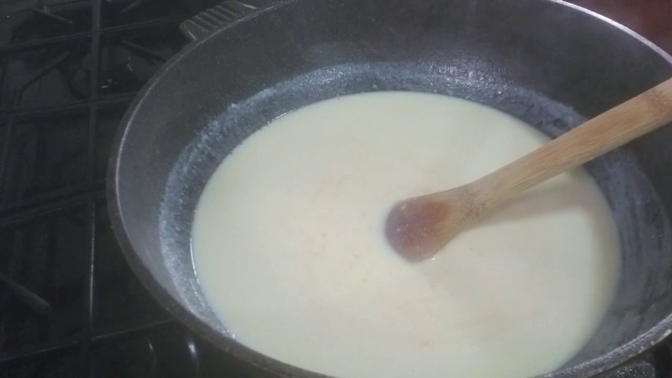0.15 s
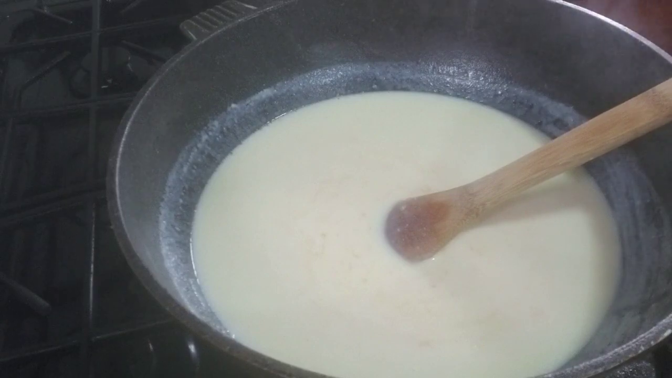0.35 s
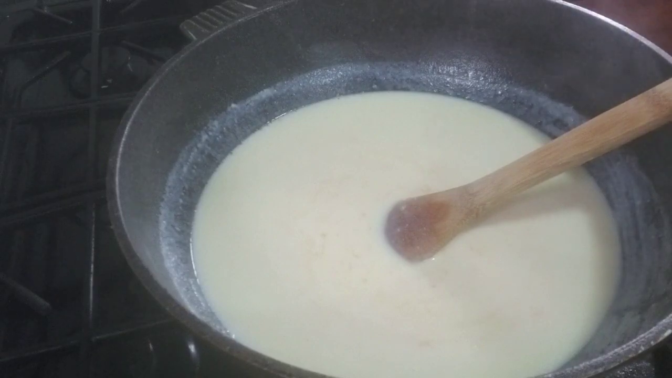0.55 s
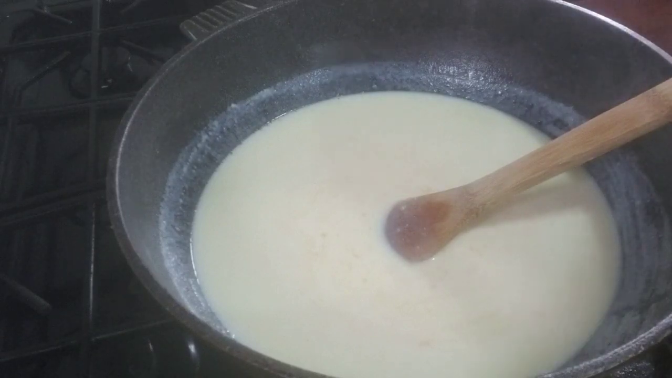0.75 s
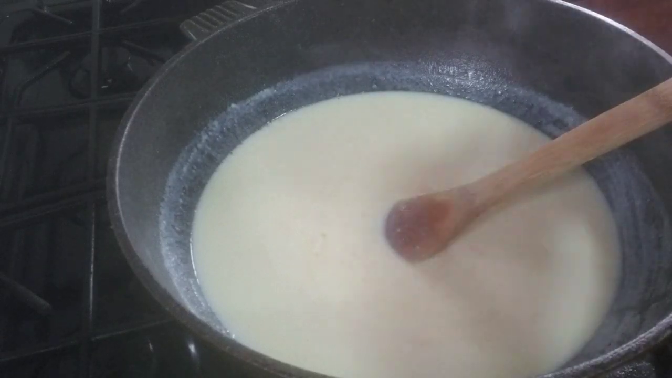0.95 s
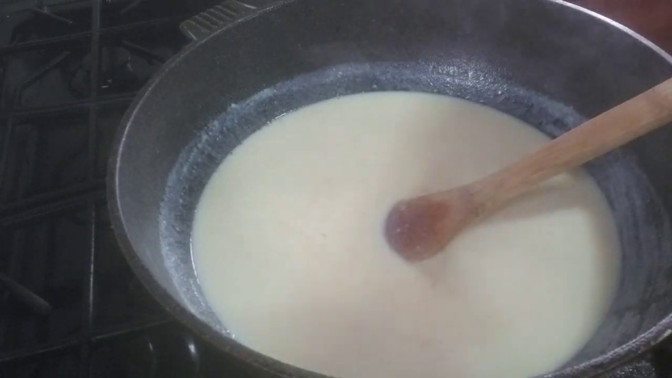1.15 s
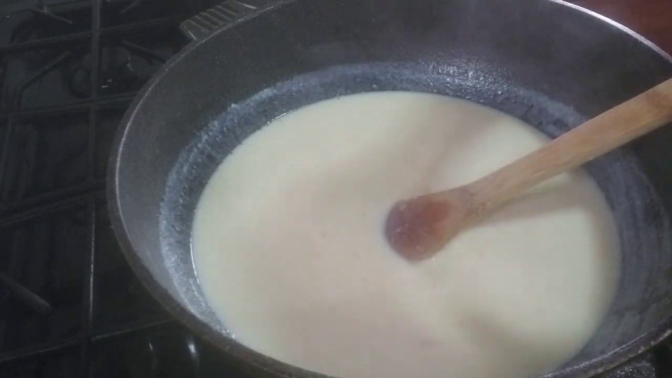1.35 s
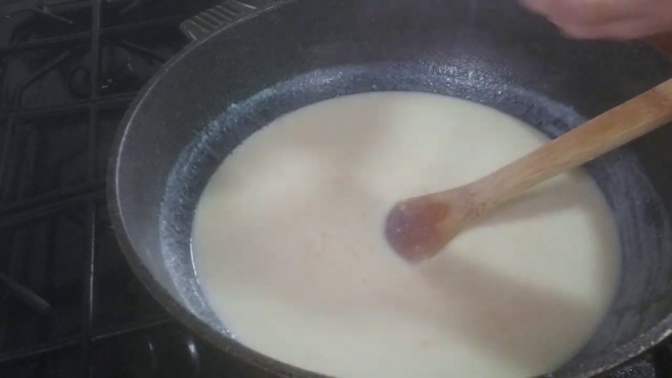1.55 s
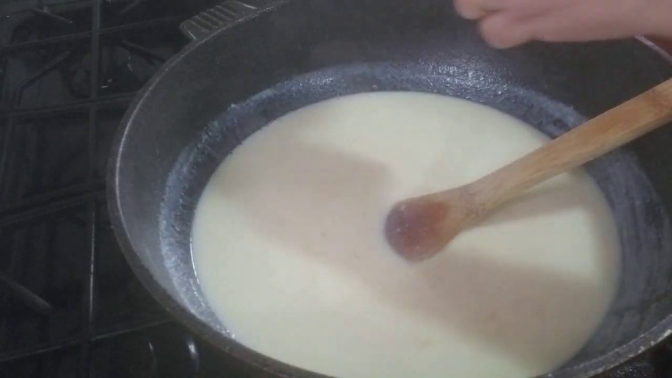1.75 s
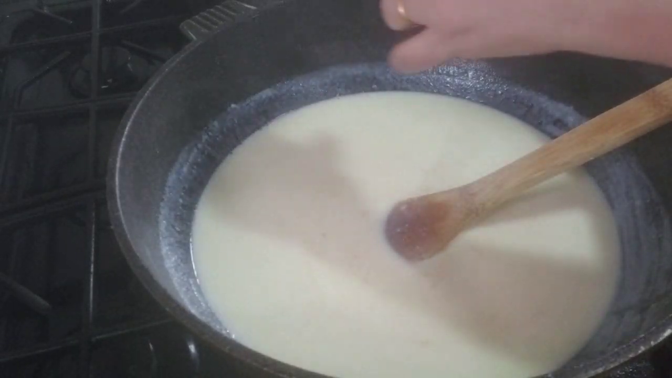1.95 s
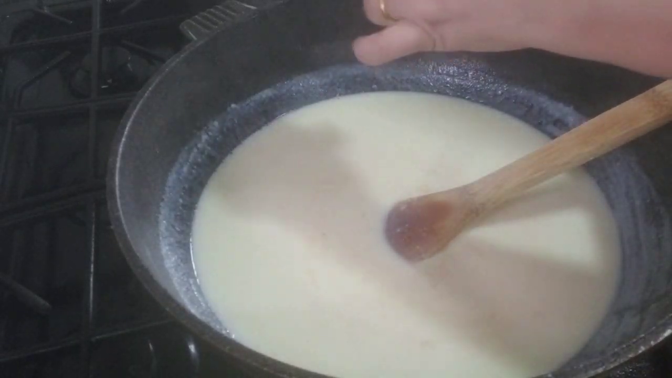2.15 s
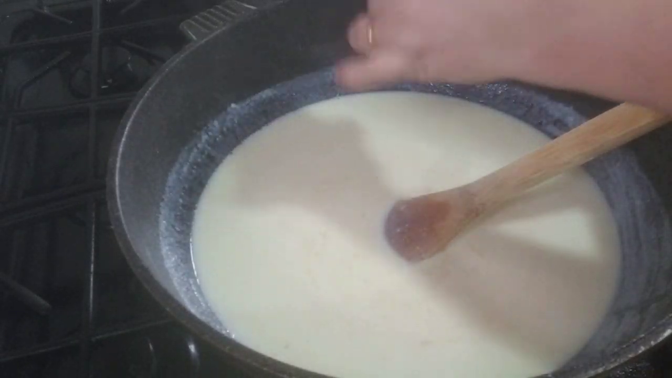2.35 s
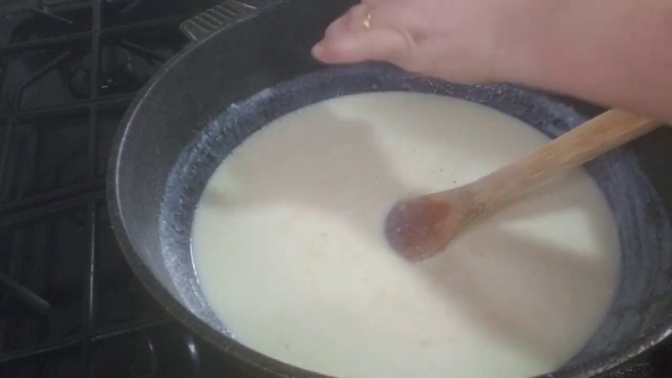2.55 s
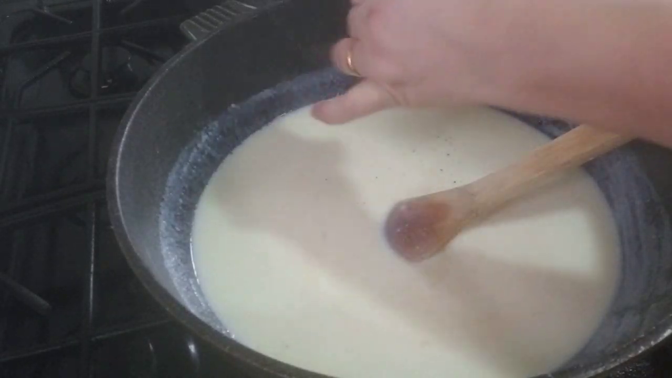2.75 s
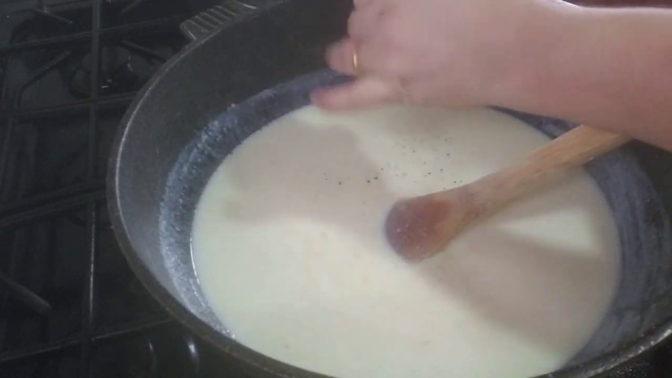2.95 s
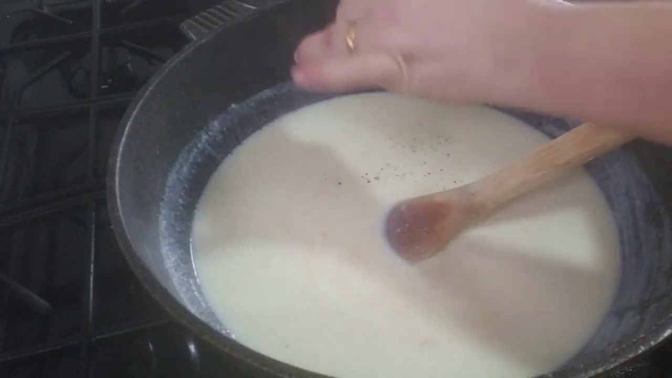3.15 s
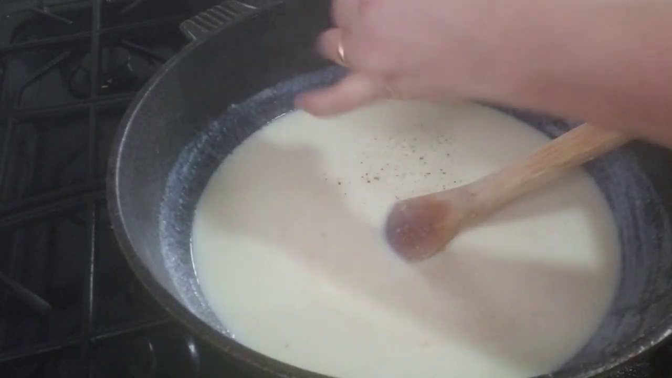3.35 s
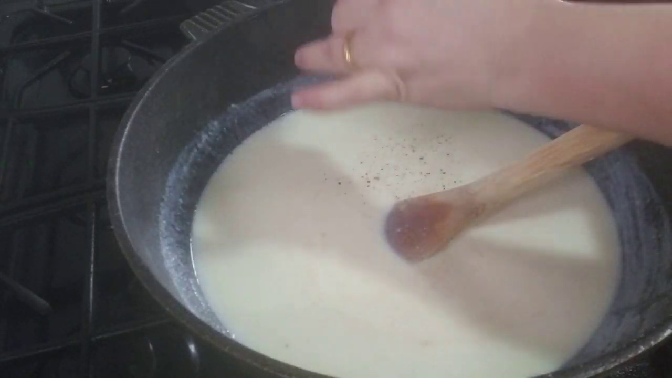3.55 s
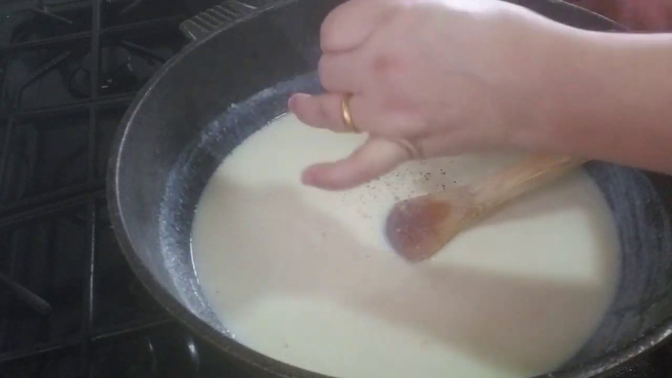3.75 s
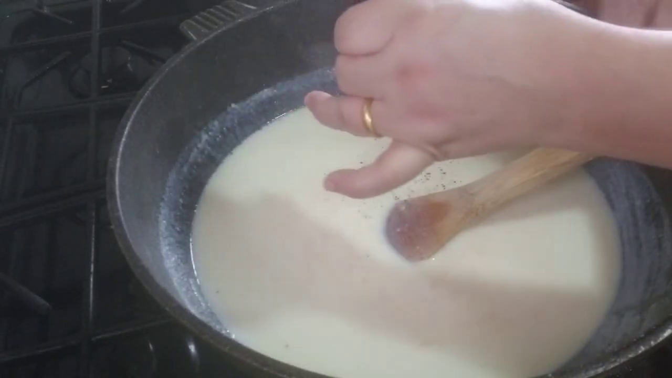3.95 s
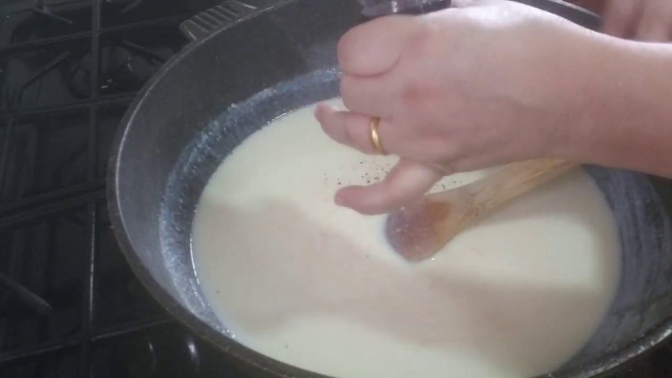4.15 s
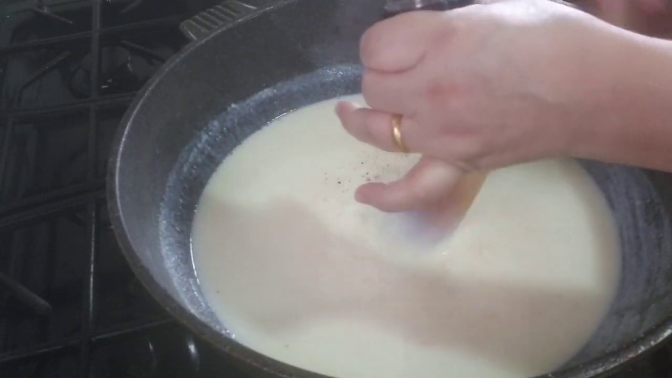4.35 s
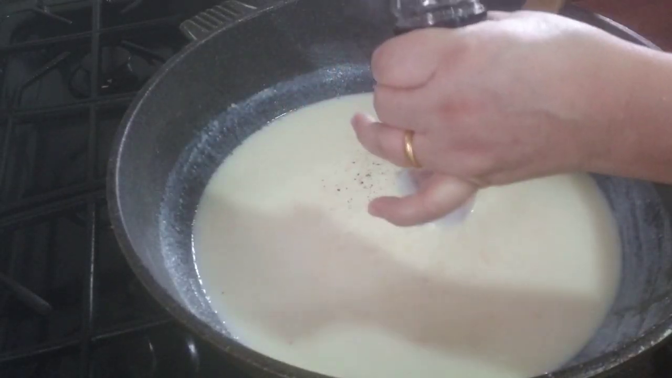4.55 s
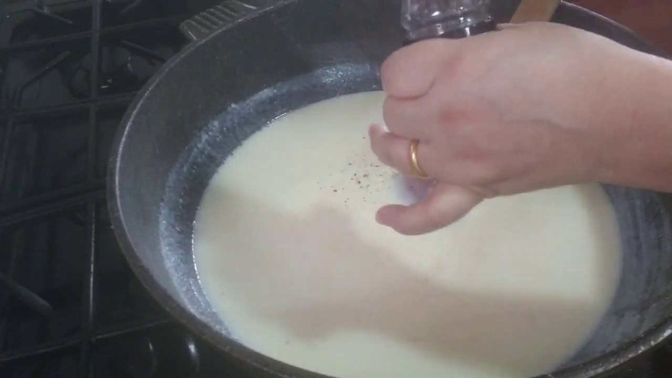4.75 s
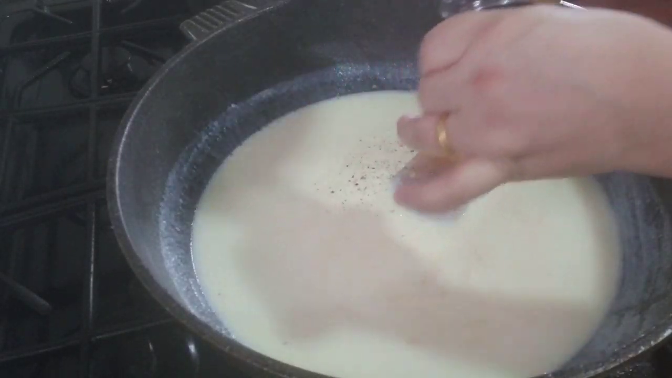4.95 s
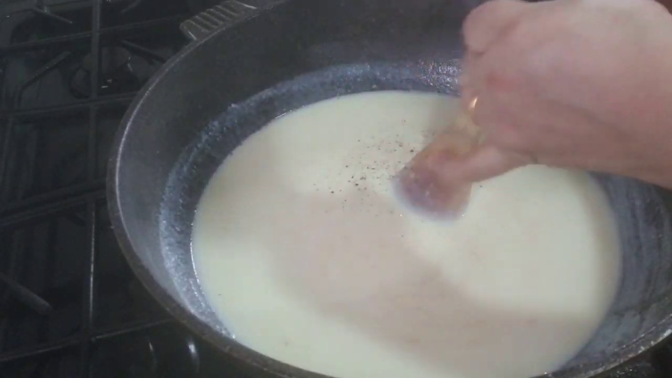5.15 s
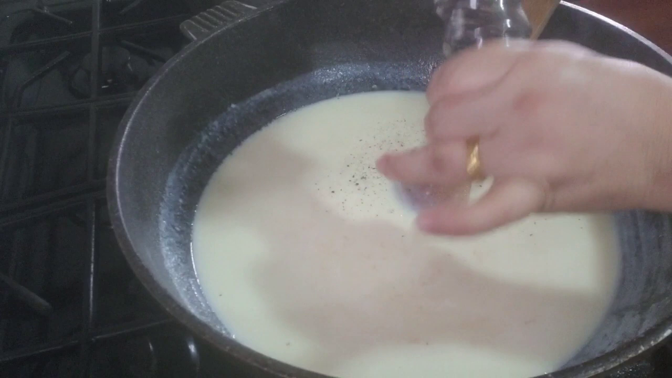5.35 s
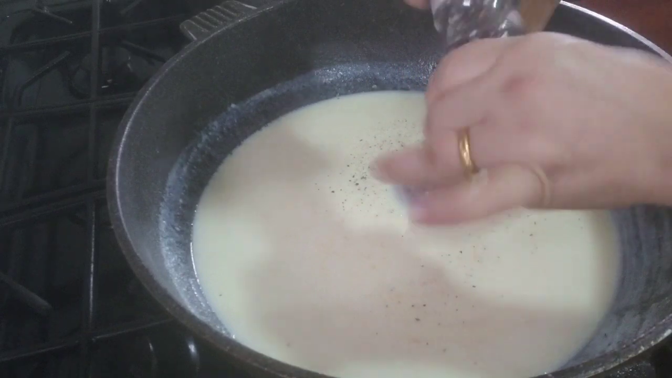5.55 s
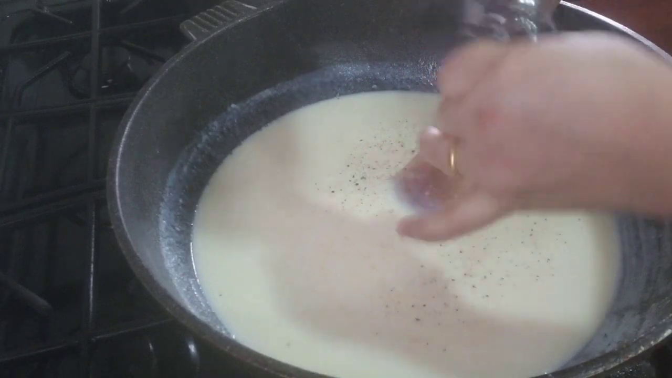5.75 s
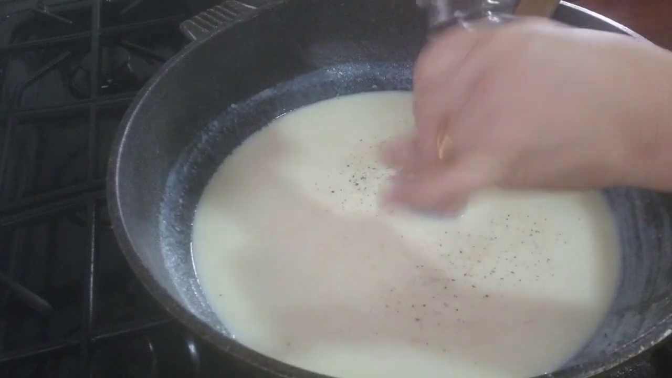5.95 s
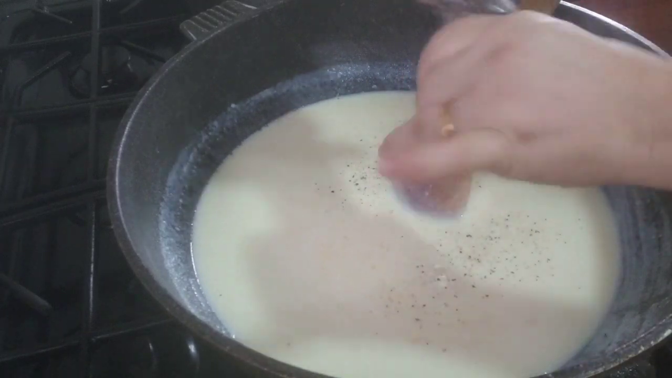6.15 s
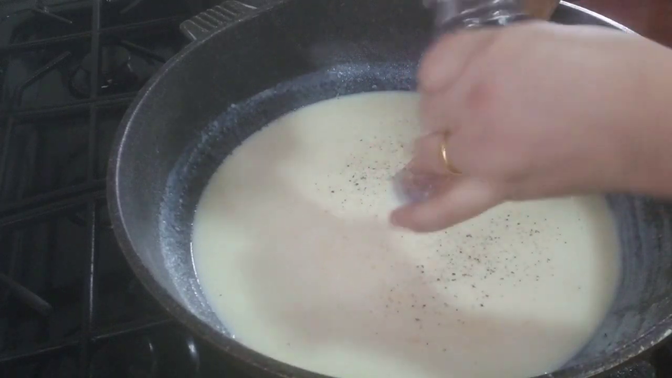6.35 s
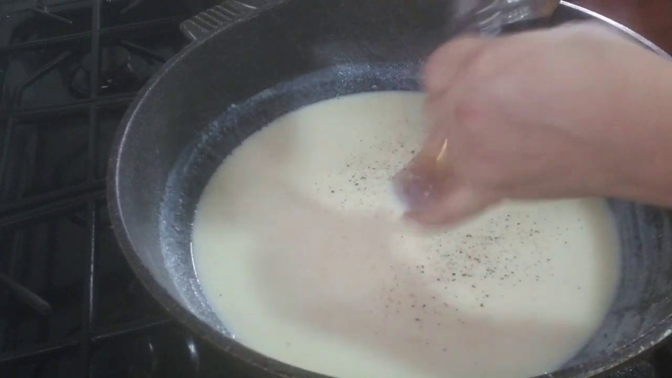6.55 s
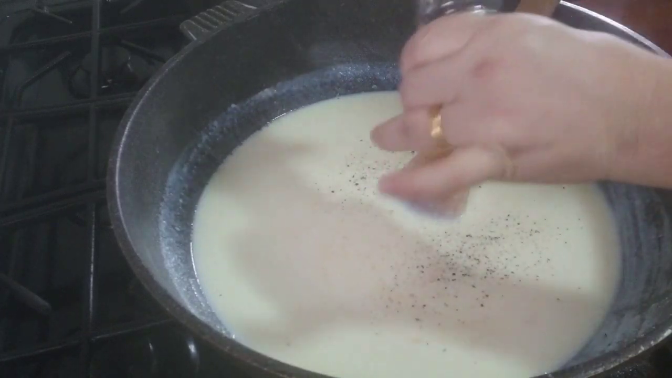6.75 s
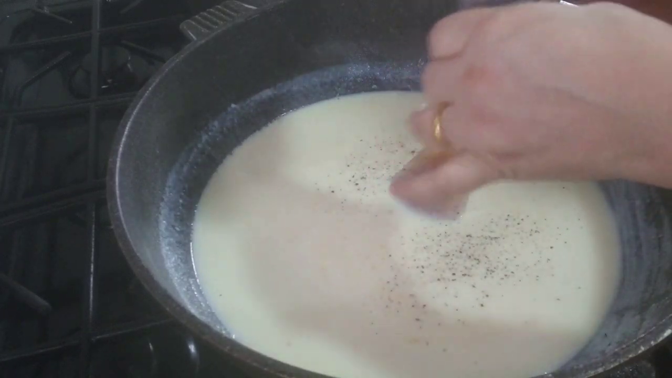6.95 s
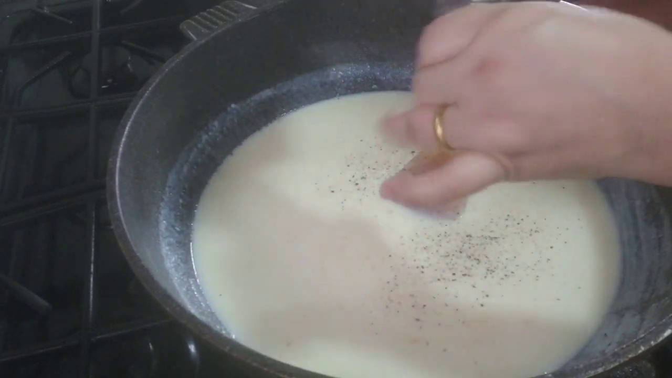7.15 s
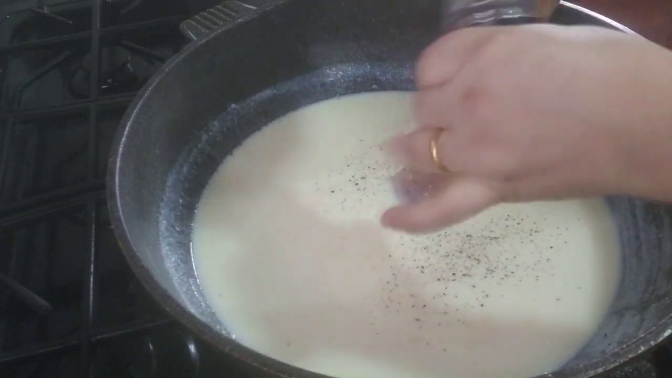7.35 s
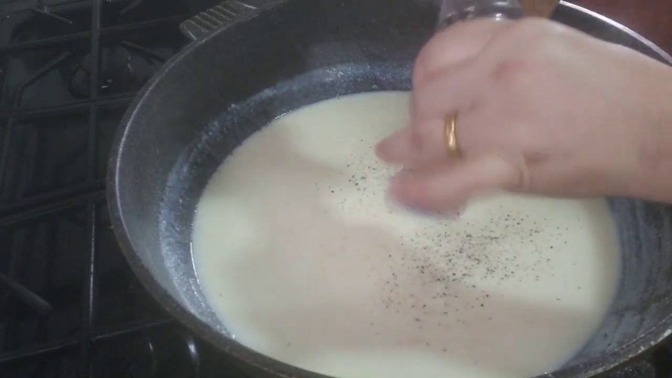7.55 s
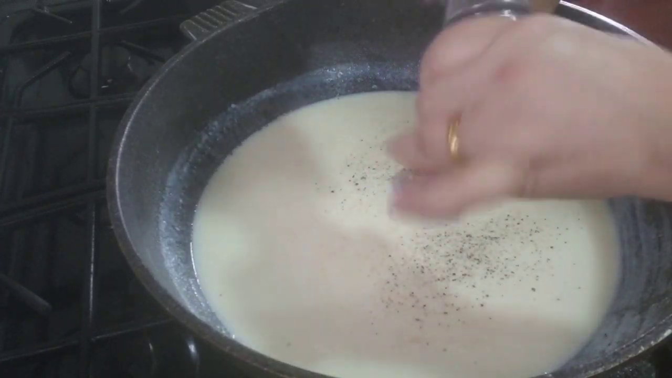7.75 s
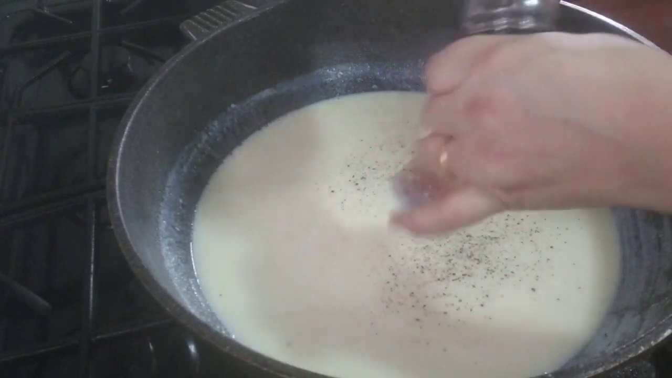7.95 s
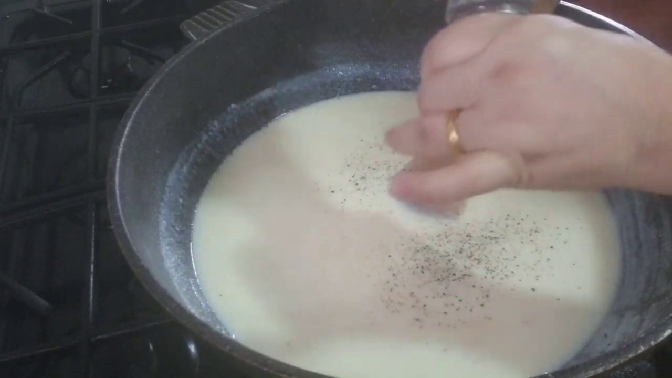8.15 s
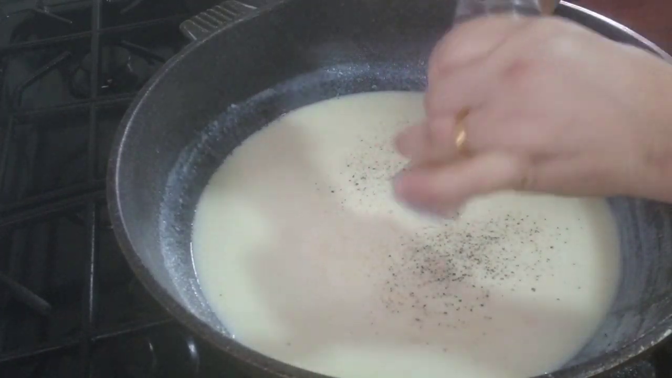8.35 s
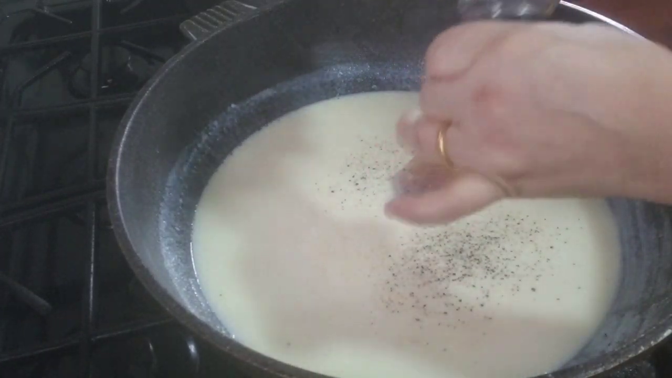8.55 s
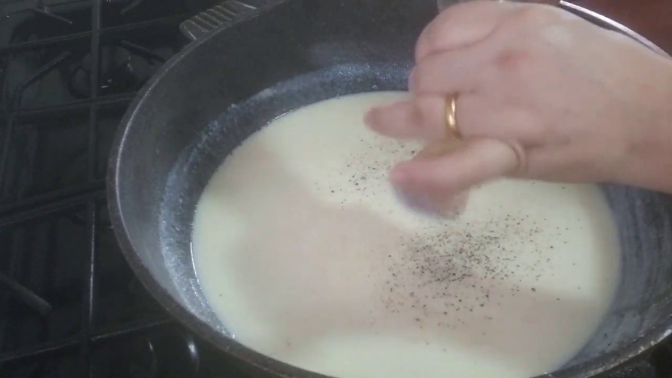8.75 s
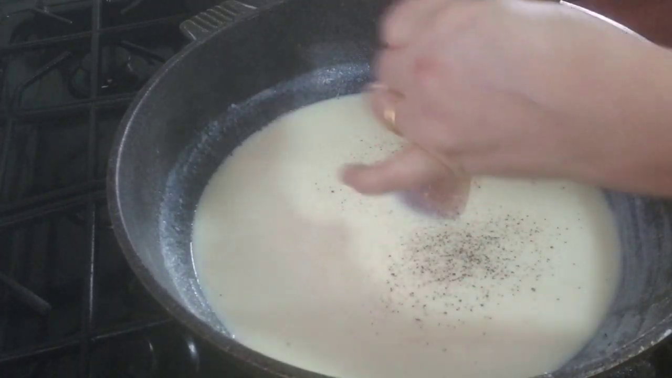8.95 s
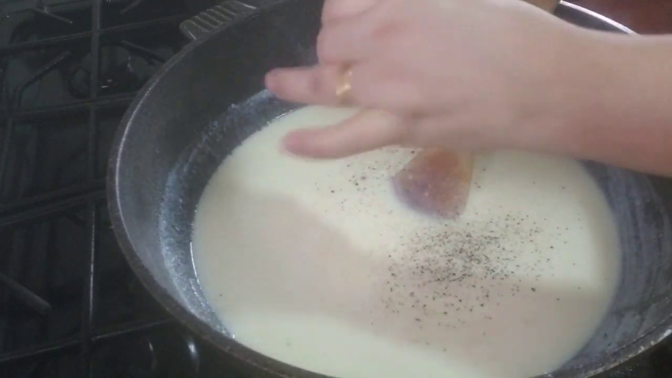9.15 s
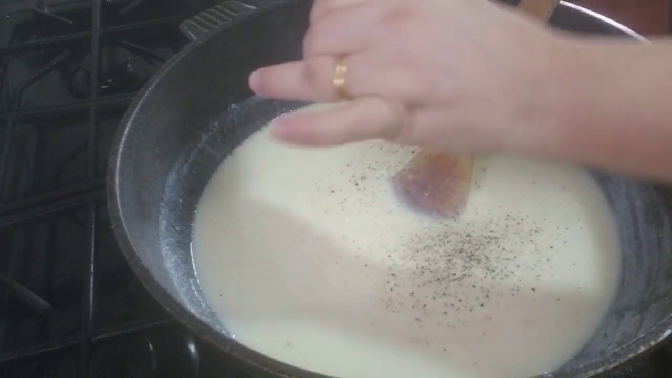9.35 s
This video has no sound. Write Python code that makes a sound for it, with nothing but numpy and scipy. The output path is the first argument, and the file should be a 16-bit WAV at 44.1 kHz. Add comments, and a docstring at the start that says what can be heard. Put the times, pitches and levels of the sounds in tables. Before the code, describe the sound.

Close up in a small kitchen, soft handling bumps lead into a few twists of a pepper grinder, each a dry, crackling crunch with a lighter rattle between. The grinding pauses and a wooden spoon knocks once against the pan. Then the mill resumes in a longer, even run, about three twists a second. A faint stove hiss and low hum lie underneath.

```python
"""Pepper mill over a pan

A mill is twisted in a small kitchen: a few turns, a pause, then a long run. In each twist dry fragments
slide into the burr, then peppercorns jam and crack, ringing the hollow body; between twists the hand
swings back with a lighter rattle. Under it lie a faint stove hiss, a low wavering hum and soft handling
bumps. In the pause a wooden spoon knocks once on the pan."""
import sys
import numpy as np
from scipy import signal
from scipy.fft import rfft, irfft
from scipy.io import wavfile
from scipy.ndimage import uniform_filter1d

SR = 44100
rng = np.random.default_rng(int(sys.argv[2]) if len(sys.argv) > 2 else 0)


def master_out(mix):
    """Clip the mix to full scale and print it as 16-bit PCM to the path in sys.argv[1]."""
    frames = np.transpose(np.atleast_2d(mix))
    ceiling = np.clip(frames, -1, 1)
    pcm = np.round(ceiling * 32767).astype(np.int16)
    wavfile.write(sys.argv[1], SR, pcm)


N = 414540
TIME = np.arange(N) / SR


def undb(db):
    """Decibels to gain."""
    return 10 ** (np.asarray(db) / 20)


def fader(rows):
    """Gain that glides through points of time and dB."""
    return undb(np.interp(TIME, *np.transpose(rows)))


def convolve(x, response):
    """Both channels through a response."""
    return signal.fftconvolve(x, np.atleast_2d(response), axes=1)[:, :N]


def colour(points, modes=(), size=8192):
    """Response of unit energy: a broad EQ curve with resonances standing on it."""
    hz, db = np.transpose(points)
    freqs = np.maximum(np.fft.rfftfreq(size, 1 / SR), 1)
    power = undb(np.interp(np.log(freqs), np.log(hz), db)) ** 2
    for centre, width, peak_db in modes:
        power += undb(peak_db) ** 2 / (1 + ((freqs ** 2 - centre ** 2) / (freqs * width)) ** 2)
    # minimum phase, so nothing rings ahead of a hit
    cepstrum = irfft(np.log(power) / 2)
    cepstrum[1:size // 2] *= 2
    cepstrum[size // 2 + 1:] = 0
    response = irfft(np.exp(rfft(cepstrum)))
    return response / np.linalg.norm(response)


def noise(shared):
    """Stereo white noise with a share of its power common to both sides."""
    return shared ** .5 * rng.standard_normal(N) + (1 - shared) ** .5 * rng.standard_normal((2, N))


def blows(times, dbs, t60s, hold):
    """Envelope of single hits, each held a moment before it dies away."""
    power, t = np.zeros(N + SR), TIME[:SR // 2]
    for start, db, t60 in zip(times, dbs, np.broadcast_to(t60s, len(times))):
        fall_db = 60 * np.clip((t - hold) / t60, 0, 3)
        power[int(start * SR):][:len(t)] += undb(db - fall_db) ** 2
    return power[:N] ** .5


def crackle(rate, spread_db, t60, hold=0.0025):
    """Envelope of many tiny random grains, mostly small and a few large; steady on average."""
    when, size = rng.random((int(rate * TIME[-1]), 2)).T
    power = np.zeros(N)
    np.add.at(power, (when * TIME[-1] * SR).astype(int), undb(-spread_db * np.log(0.0076 + size)) ** 2)
    t = TIME[:int((hold + t60) * SR)]
    fall = undb(-60 * np.maximum(t - hold, 0) / t60)
    grains = np.maximum(signal.oaconvolve(power, fall ** 2)[:N], 1e-16)
    return np.sqrt(grains / (uniform_filter1d(grains, size=2600) + 1e-12))


BITE_RISE_DB_PER_S, RUSTLE_FALL_DB_PER_S, CRUSH_FALL_DB_PER_S = 1142.5, 225, 296
LIGHT_RISE_DB_PER_S, LIGHT_FALL_DB_PER_S = 2498, 294


def stroke(start, hold, db, rise=LIGHT_RISE_DB_PER_S, fall=LIGHT_FALL_DB_PER_S):
    """Power of one stroke of the hand: it swells, holds while the hand presses, and fades."""
    early = np.maximum(start - TIME, 0)
    late = np.maximum(TIME - start - hold, 0)
    return undb(db - np.minimum(rise * early + fall * late, 100)) ** 2


# EQ of the stove hiss. Each row: frequency in Hz, gain in dB.
STOVE_EQ = [(25, -19.5), (50, 11.5), (130, 7.5), (220, -3.5), (520, -5), (800, -1), (1050, -8.5),
            (1700, -16.5), (2100, -16), (3600, -16.5), (5500, -13), (7800, -15), (9300, -27.5),
            (12000, -16.5)]
# Faint whistles in the hiss. Each row: frequency in Hz, width in Hz, gain in dB.
STOVE_WHISTLES = [(140, 3.6, 7), (370, 28, -0.5), (620, 29.4, 2.5), (2560, 150, -7.5), (2842, 103, 2.5),
                  (5380, 90, -8.5)]
# Fader ride of the hiss. Each row: time in seconds, level in dB.
STOVE_FADER = [(0, -47.5), (2, -46.5), (2.6, -53.5), (3.7, -58), (4.4, -57.5), (4.9, -49.5), (7, -55),
               (9.4, -51)]


def stove():
    """A smooth bed of hiss with faint whistles in it."""
    return convolve(noise(shared=0.28), colour(STOVE_EQ, STOVE_WHISTLES)) * fader(STOVE_FADER)


# Fader ride of the hum. Each row: time in seconds, relative level in dB.
HUM_FADER = [(0, -54), (.47, -55), (.58, -39), (1.41, -41), (1.48, -52), (2.12, -45), (2.25, -52),
             (3.2, -69), (4.45, -66), (4.8, -58), (6.6, -54.5), (8, -65), (9.4, -50)]


def hum():
    """A low tone that wavers in pitch, with a little rumble around it."""
    knots = np.arange(0, TIME[-1] + 1, .06)
    pitch_hz = 81.5 + 3.9 * np.interp(TIME, knots, rng.standard_normal(len(knots)))
    tone = np.sqrt(2) * np.sin(2 * np.pi * np.cumsum(pitch_hz) / SR)
    rumble_eq = [(25, -17), (55, -12.5), (76, 12), (105, -13.5), (138, -4), (220, -32), (800, -68)]
    rumble = convolve(noise(shared=1), colour(rumble_eq))
    return fader(HUM_FADER) * (undb(-2) * tone + undb(-13.5) * rumble)


# Soft handling bumps. Each row: start in seconds, relative level in dB, ring time in seconds.
BUMPS = [(0.114, -36.5, 0.19), (0.201, -37, 0.19), (0.612, -30, 0.11), (0.755, -35.5, 0.18),
         (0.799, -34.5, 0.2), (1.274, -38.5, 0.3), (1.309, -40, 0.2), (1.918, -32.5, 0.31),
         (1.956, -38, 0.084), (3.456, -34.5, .015)]
# EQ of a bump. Each row: frequency in Hz, gain in dB.
BUMP_EQ = [(40, -31), (80, -17.5), (140, -8), (200, -4.5), (320, -2), (600, -4.5), (1000, -14),
           (2000, -23.5), (8000, -31)]
# Boom under a bump. Each row: frequency in Hz, width in Hz, gain in dB.
BOOM_MODES = [(133.5, 9.4, 14), (173, 12, 8.5), (232, 46, 1)]


def handling():
    """Dull bumps of handling that set off a low boom."""
    times, dbs, t60s = np.transpose(BUMPS)
    bumps = blows(times, dbs - 5.5, t60s, hold=0.012) * noise(shared=0.53)
    return convolve(bumps, colour(BUMP_EQ, BOOM_MODES))


# Ticks in the burr. Each row: start in seconds, relative level in dB.
TICKS = [(0.614, -30.5), (1.111, -27.5), (1.169, -18.5), (1.18, -19), (1.2214, -17), (1.240, -20),
         (1.340, -21.5), (2.1515, -24), (2.162, -26), (2.386, -21.5), (2.4633, -16.5), (2.695, -20.5),
         (3.847, -41), (5.002, -16), (5.7225, -23.5), (6.0382, -11), (6.301, -25), (6.3824, -16),
         (6.6474, -15), (6.8375, -20), (7.33, -23), (8.0305, -14), (8.3143, -18), (9.2935, -21)]
# EQ of a tick. Each row: frequency in Hz, gain in dB.
TICK_EQ = [(1500, -35), (4000, -14), (6400, 2.5), (8200, 3.5), (10000, -4.5), (12500, 1.5), (14500, -13)]


def loose_bits():
    """Loose bits of pepper tick brightly against the teeth."""
    times, dbs = np.transpose(TICKS)
    ticks = blows(times, dbs - 5, t60s=.007, hold=0.0014) * noise(shared=.3)
    return convolve(ticks, colour(TICK_EQ))


# Finger scrapes. Each row: start in seconds, hold in seconds, level in dB, band centre in Hz.
SCRAPES = [(0.63, 0.018, -46.5, 11300), (0.838, 0.034, -50, 4500), (1.044, 0.033, -54, 1950),
           (1.925, 0.023, -46.5, 6460)]


def fingers():
    """Fingers brush the mill in short, grainy scrapes as the hand finds its hold."""
    skin = noise(shared=0.32) * crackle(rate=870, spread_db=3.5, t60=.015)
    out = np.zeros((2, N))
    for start, hold, db, hz in SCRAPES:
        level = stroke(start, hold, db, rise=BITE_RISE_DB_PER_S) ** .5
        band = colour([(500, -40), (14000, -30.5)], modes=[(hz, 0.67 * hz, 0)])
        out += convolve(level * skin, band)
    return out


# Light turns and back-swings, with only loose bits in the burr. Each row: start in seconds,
# hold in seconds, rustle drive in dB, crush drive in dB.
LIGHT_TURNS = [(1.175, 0.097, -40, -78), (1.293, 0.14, -47, -72), (1.665, 0.17, -43.5, -64),
               (2.386, 0.25, -36.5, -41.5), (2.692, 0.24, -40.5, -43), (2.996, 0.072, -43, -45),
               (3.29, 0.23, -41, -44), (3.55, 0.071, -46.5, -50), (3.84, 0.13, -60, -70),
               (4.976, 0.054, -29, -38.5), (5.095, 0.19, -37, -38), (5.419, 0.056, -33, -36),
               (5.704, 0.017, -29, -38), (5.76, 0.19, -38, -41.5), (5.992, 0.15, -39, -40.5),
               (6.274, 0.043, -35.5, -38.5), (6.556, 0.049, -38.5, -39.5), (6.834, 0.023, -37.5, -43.5),
               (6.928, .13, -42, -76), (7.323, 0.065, -35.5, -37.5), (7.633, 0.071, -39.5, -39),
               (7.893, 0.092, -41.5, -43), (8.208, 0.056, -39, -37.5), (8.464, 0.082, -43.5, -57),
               (8.878, 0.09, -37, -40), (9.183, 0.13, -35.5, -38.5)]
# Full twists. Each row: start of the bite in seconds, hold in seconds, rustle drive in dB, crush drive
# in dB, lead-in of sliding fragments in seconds, their rustle drive in dB, the resonance this grip
# leaves free in Hz, its gain in dB.
TWISTS = [(1.573, 0.059, -29, -52, 0.05, -35.5, 1700, 18), (2.211, 0.051, -23, -23, 0.097, -41, 1540, -3.5),
          (2.561, 0.018, -23, -25, 0.08, -34, 3060, 11), (2.854, 0.019, -32, -37, 0.095, -33.5, 1840, -12),
          (3.128, 0.041, -29.5, -28.5, 0.043, -34.5, 2500, 12),
          (3.456, .012, -44, -38, 0.079, -37, 3050, 6),
          (5.278, 0.047, -19.5, -21.5, 0.035, -23.5, 2180, 1.5),
          (5.559, 0.049, -22, -26, .025, -30, 1500, -2),
          (5.865, 0.035, -23.5, -23.5, 0.063, -26.5, 2370, -2),
          (6.159, 0.035, -22.5, -28, 0.078, -27.5, 2410, 10),
          (6.417, 0.058, -27.5, -30.5, 0.053, -31.5, 1800, 9),
          (6.693, 0.064, -27.5, -32.5, 0.056, -29.5, 1920, 0),
          (7.177, 0.073, -28, -31.5, 0.029, -37, 1310, -2),
          (7.512, 0.057, -28.5, -41, 0.083, -30, 1320, 11.5), (7.788, 0.01, -28, -25, 0.064, -28, 1470, 1),
          (8.064, 0.041, -29.5, -30, 0.06, -30, 1960, 1), (8.342, 0.046, -28.5, -28, 0.057, -32, 2060, -2),
          (8.708, 0.041, -25, -26.5, 0.12, -38.5, 1430, 15.5),
          (9.044, 0.047, -25, -26.5, 0.052, -29.5, 1300, 3),
          (9.336, 0.077, -23, -27, 0.035, -26.5, 2300, 3)]


def hand():
    """Envelopes of rustle and crush: fragments slide in, then the corns bite; light turns lie between."""
    rustle, crush = np.zeros(N), np.zeros(N)
    for start, hold, rustle_db, crush_db, lead, lead_db, _, _ in TWISTS:
        rustle += stroke(start - lead, lead, lead_db)
        rustle += stroke(start, hold, rustle_db, BITE_RISE_DB_PER_S, RUSTLE_FALL_DB_PER_S)
        # sliding fragments already press lightly on the burr
        crush += stroke(start - lead / 2, lead / 2, lead_db - 7, BITE_RISE_DB_PER_S, CRUSH_FALL_DB_PER_S)
        crush += stroke(start, hold, crush_db, BITE_RISE_DB_PER_S, CRUSH_FALL_DB_PER_S)
    for start, hold, rustle_db, crush_db in LIGHT_TURNS:
        rustle += stroke(start, hold, rustle_db)
        crush += stroke(start, hold, crush_db)
    return rustle ** .5, crush ** .5


def gripped(modes, detune=.018, scatter_db=2.5):
    """A new grip retunes the resonances a little and damps them unevenly."""
    chance = rng.standard_normal((len(modes), 2))
    return [(hz * (1 + detune * shift), width, db + scatter_db * lift)
            for (hz, width, db), (shift, lift) in zip(modes, chance)]


def by_twist(x, responses, regrip_s=.13):
    """Each twist gets a response of its own: hand and mill move just before the corns bite."""
    edges = [0] + [int((bite - regrip_s) * SR) for bite, *_ in TWISTS[1:]] + [N]
    out = np.zeros((2, N + SR))
    for start, end, response in zip(edges, edges[1:], responses):
        part = signal.fftconvolve(x[:, start:end], np.atleast_2d(response), axes=1)
        out[:, start:start + part.shape[1]] += part
    return out[:, :N]


# EQ of the rustle. Each row: frequency in Hz, gain in dB.
RUSTLE_EQ = [(300, -55.5), (1100, -25.5), (2500, -4), (4000, -3), (6300, 0.5), (7700, 0.5), (9000, -2.5),
             (10800, 1), (13500, 0.5), (14500, -8)]
# Resonances of the burr. Each row: frequency in Hz, width in Hz, gain in dB.
BURR_MODES = [(1720, 290, -8.5), (2310, 91, -12), (7750, 340, 3.5), (12600, 670, 0)]


def burr(rustle, fractures):
    """Dry fragments slide through the burr and stir its bright resonances."""
    dust = crackle(rate=700, spread_db=4, t60=0.016)
    grit = rustle * np.hypot(undb(-0.5) * dust, undb(-7) * fractures) * noise(shared=0.18)
    return by_twist(grit, [colour(RUSTLE_EQ, gripped(BURR_MODES)) for _ in TWISTS])


# EQ of the crunch. Each row: frequency in Hz, gain in dB.
CRUSH_EQ = [(100, -26.5), (250, -61), (380, -15), (600, -38), (1000, -9), (1400, 0.5), (2000, 8.5),
            (2800, -2), (4200, 4.5), (6000, -6), (9000, -32), (14000, -10.5)]
# EQ of the shell's deeper knock. Each row: frequency in Hz, gain in dB.
SHELL_EQ = [(100, -24), (200, -11), (380, -7), (560, 0), (800, -1), (1050, -1), (1300, 4), (2000, 1),
            (3000, -14), (8000, -55)]
# Resonances of the hollow mill. Each row: frequency in Hz, width in Hz, gain in dB.
BODY_MODES = [(692.7, 14, 2), (893, 26, -1), (1320, 77, 5.5), (1443, 56, 4), (1700, 70, 6.5),
              (1838, 34, 13), (1980, 60, 1.5), (2460, 64, 8), (2950, 130, 4), (3570, 60, -10),
              (3880, 108, 4.5)]


def hollow_body(crush, fractures, free_width_hz=97):
    """Crushing and cracking ring the body; the harder crunches shake the shell into a deeper knock."""
    times, _, body_db, _, _ = np.transpose(CRACKS)
    thuds = blows(times, body_db - 1.5, t60s=1.21 * CRUMBLE_S, hold=0.0018)
    force = np.hypot(crush * undb(-3.5) * fractures, thuds)
    crunch = force * noise(shared=0.42)
    knock = undb(-13) * force * np.tanh(force / undb(-28)) * noise(shared=0.85)
    grips = [colour(CRUSH_EQ, gripped(BODY_MODES) + [(hz, free_width_hz, db)]) for *_, hz, db in TWISTS]
    return by_twist(crunch, grips) + convolve(knock, colour(SHELL_EQ, BODY_MODES[:4]))


# Single corns cracking. Each row: start in seconds, relative levels in dB of the bright snap,
# the body's ring and the woody pock, then the pock's pitch in Hz.
CRACKS = [(2.2, -5.5, -23, -16.5, 2690), (2.2164, -5, -16, -15, 1650), (2.23, -12, -22, -19, 1750),
          (2.262, -7, -20, -22, 4000), (2.2732, -9.5, -17.5, -12.5, 4120), (2.5458, -13.5, -20, -20, 2500),
          (2.5586, -4.5, -19, -11.5, 3000), (2.571, -16, -23, -18.5, 960), (2.5788, -12, -18, -14, 2980),
          (2.5947, -10, -24, -22, 1710), (2.856, -17, -24.5, -24, 2320), (2.860, -10, -22, -19, 4370),
          (2.878, -16, -29, -25, 2600), (3.125, -14, -29, -25, 1940), (3.135, -22, -32, -31, 840),
          (3.180, -8, -34, -26, 3000), (3.4537, -14, -24.5, -23, 3000), (3.457, -1.5, -21, -15.5, 3870),
          (3.4601, -7, -23.5, -13, 2960), (5.1015, -20, -40, -35, 2100), (5.1763, -20, -33, -29, 1740),
          (5.191, -4.5, -38, -28, 3430), (5.2712, -6, -15, -9, 1680), (5.287, -5, -15, -7, 2130),
          (5.295, -12, -16.5, -22, 1500), (5.3104, -11, -20, -22, 1800), (5.329, -11, -25, -19, 3900),
          (5.4215, -13, -36, -29, 2360), (5.563, -18, -20, -21, 1700), (5.5807, -14, -20, -17.5, 1950),
          (5.601, -12, -29, -14.5, 4110), (5.8668, -7, -18, -16, 1760), (5.9142, -6, -26, -21.5, 1530),
          (6.0005, -11.5, -27, -26, 3860), (6.1409, -24, -22, -17, 2920), (6.1582, -7, -19, -17, 2430),
          (6.166, -6, -16, -12.5, 1920), (6.4112, -22, -31, -24, 2950), (6.471, -7.5, -26, -17, 3960),
          (6.5868, -19.5, -33, -29, 1960), (6.7349, -17, -35, -24, 2930), (7.158, -14, -22, -26, 1800),
          (7.1796, -21, -21, -22.5, 1350), (7.1912, -7, -15, -10, 3700), (7.2277, -12, -26, -25, 2390),
          (7.5055, -2, -15.5, -11.5, 1390), (7.508, -7, -24, -15, 4300), (7.532, -16, -36, -22, 2140),
          (7.689, -28, -38, -30, 1850), (7.7921, -13, -17.5, -19, 1500), (7.8062, -7.5, -26, -23, 2200),
          (8.063, -16, -21, -24, 1890), (8.2398, -23, -35, -27.5, 1790), (8.703, -16, -24.5, -17.5, 1640),
          (8.7435, -13, -26, -29, 1790), (8.885, -16.5, -40, -36, 1890), (8.894, -15, -33, -30, 1820),
          (9.037, -18, -29, -26.5, 1790), (9.063, -13, -26, -26, 3000), (9.3354, -20, -34, -23, 1880)]
# EQ of a snap. Each row: frequency in Hz, gain in dB.
SNAP_EQ = [(300, -33), (1100, -20.5), (2500, -2), (4000, 0), (6000, -1.5), (7700, 6.5), (9000, -4),
           (10800, 3), (13500, 5.5), (14500, 1)]
CRUMBLE_S = 0.013


def snaps():
    """A corn snaps: one brittle break, then a cascade of splinters a few milliseconds long."""
    times, dbs, *_ = np.transpose(CRACKS)
    splinters = crackle(rate=3400, spread_db=3, t60=0.0016)
    cascade = blows(times, dbs - 6, t60s=CRUMBLE_S, hold=.002) * splinters * noise(shared=.2)
    first_break = blows(times, dbs - 7, t60s=.003, hold=.0005) * noise(shared=.4)
    return convolve(first_break + cascade, colour(SNAP_EQ))


def pocks(t60=0.015, step_s=.0018, step_db=-5, pitch_scatter=.13):
    """The woody note of a corn giving way in three quick steps, each weaker and slightly detuned."""
    out, t = np.zeros((2, N + SR)), TIME[:SR // 20]
    decay = undb(-60 * t / t60)
    for crack_s, _, _, db, hz in CRACKS:
        for step, (late, detune, left, right) in enumerate(rng.standard_normal((3, 4))):
            start = int((crack_s + step * step_s * np.exp(late / 4)) * SR)
            pitch_hz = hz * np.exp(pitch_scatter * detune * min(step + .5, 1))
            stereo_phase = .6 * np.array([[left], [right]])
            ring = np.sin(2 * np.pi * pitch_hz * t + stereo_phase) * decay
            out[:, start:start + len(t)] += undb(db + step * step_db) * ring
    return out[:, :N]


def mill(low_cut_hz=373):
    """All layers of the grind, with the bass cut away."""
    rustle, crush = hand()
    fractures = crackle(rate=270, spread_db=2.6, t60=0.018)
    grind = loose_bits() + burr(rustle, fractures) + hollow_body(crush, fractures) + snaps() + pocks()
    return signal.sosfilt(signal.butter(4, low_cut_hz, "high", fs=SR, output="sos"), grind)


# Ring of spoon and pan. Each row: frequency in Hz, relative level in dB, ring time in seconds.
SPOON_MODES = [(135, -11.5, 0.58), (664, -0.5, .17), (880, -4, 0.14), (1071, -5, 0.21), (1502, -15, .13),
               (1787, -9, .15), (2229, -8, 0.21)]
# EQ of the spoon's contact. Each row: frequency in Hz, gain in dB.
CONTACT_EQ = [(100, -12), (330, 0), (760, -0.5), (1200, -3), (2000, -0.5), (3500, -12), (7000, -19),
              (12000, -60)]


def spoon(start=4.5675):
    """The wooden spoon is nudged against the rim: one dry contact, then wood and pan ring on."""
    t = np.maximum(TIME - start, 0)
    ring = sum(undb(db - 60 * t / t60) * np.sin(2 * np.pi * hz * t) for hz, db, t60 in SPOON_MODES)
    contact = blows([start], dbs=[-32.5], t60s=0.075, hold=0.0023) * noise(shared=0.45)
    return undb(-36) * ring + convolve(contact, colour(CONTACT_EQ))


def place(x, right_lag_samples, right_db):
    """Stereo placement: the right side is a little later and louder than the left."""
    late_right = np.pad(x[1], (right_lag_samples, 0))[:N]
    return np.array([x[0] * undb(-right_db / 2), late_right * undb(right_db / 2)])


def kitchen(x, t60, room_db, predelay_s=.004):
    """Reverb of a small hard room; its pattern shifts as the mill moves."""
    t = TIME[:SR // 2]
    wash = rng.standard_normal((len(TWISTS), 2, len(t)))
    low = signal.sosfilt(signal.butter(2, 5000, fs=SR, output="sos"), wash)
    high = signal.sosfilt(signal.butter(2, 5000, "high", fs=SR, output="sos"), wash)
    tails = (low - high) * undb(-60 * t / t60) * (t > predelay_s)  # a gentle lift where the bands meet
    return undb(room_db) * by_twist(x, tails / np.linalg.norm(tails, axis=2, keepdims=True))


def narrow_bass(x, below_hz=220.5):
    """Long waves reach both sides nearly alike."""
    side = signal.sosfiltfilt(signal.butter(1, below_hz, fs=SR, output="sos"), (x[0] - x[1]) / 2)
    return x - .6 * np.array([side, -side])


def scene():
    """Mill, spoon and hands in the room, over the bed of hiss and hum."""
    close = place(handling() + fingers() + mill() + spoon(), right_lag_samples=3, right_db=2)
    return narrow_bass(close + kitchen(close, t60=0.21, room_db=-4) + stove() + hum())


def record(dry):
    """Soft clipping rounds the highest peaks; a steep low-pass cuts the top."""
    return signal.sosfilt(signal.ellip(10, .2, 70, 14500, fs=SR, output="sos"), np.tanh(dry))


dry = scene()
out = record(dry)
master_out(out)
```